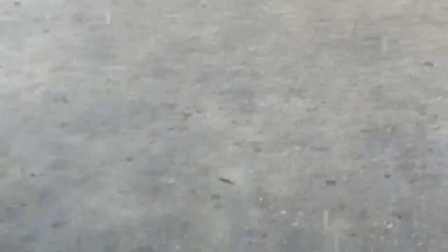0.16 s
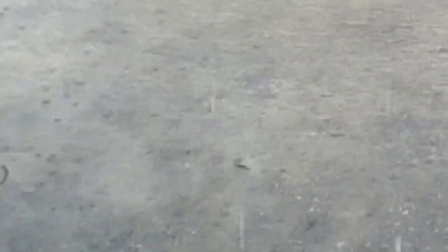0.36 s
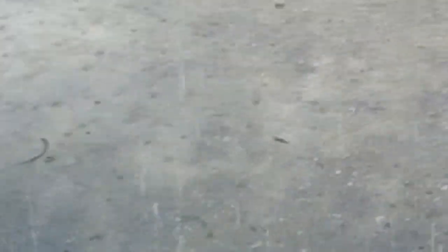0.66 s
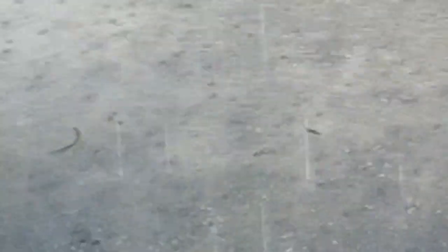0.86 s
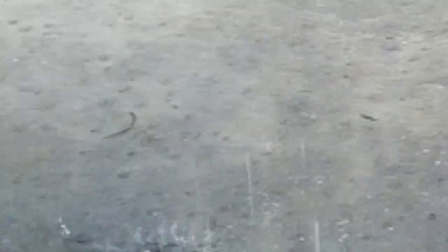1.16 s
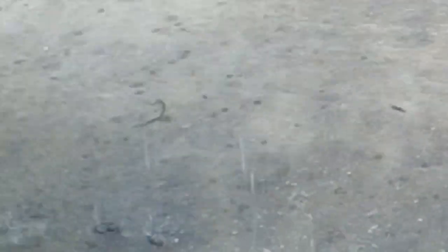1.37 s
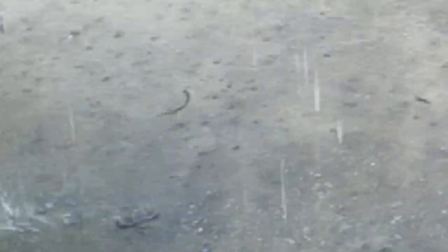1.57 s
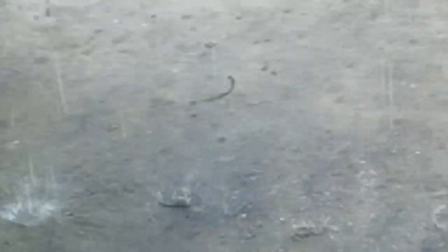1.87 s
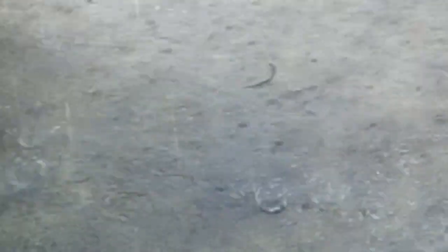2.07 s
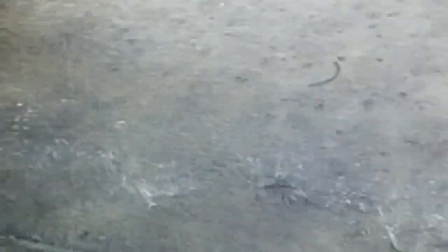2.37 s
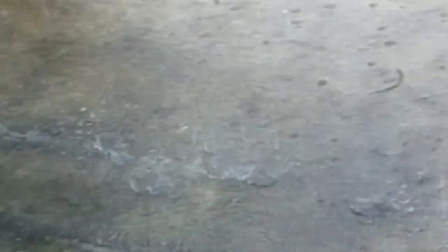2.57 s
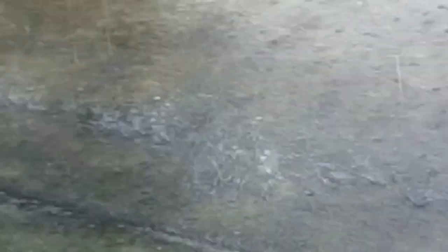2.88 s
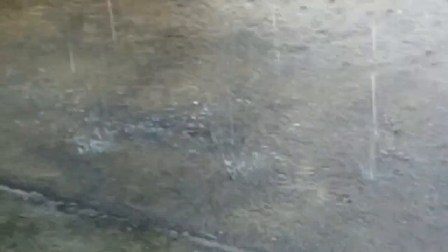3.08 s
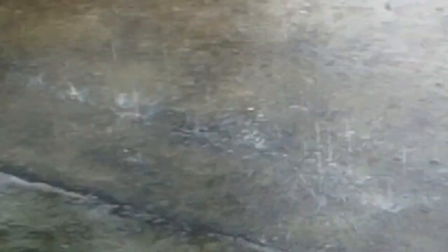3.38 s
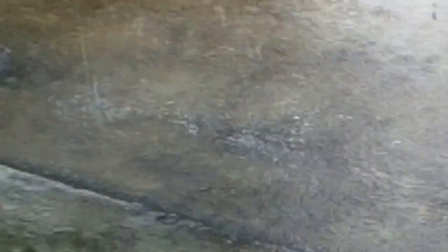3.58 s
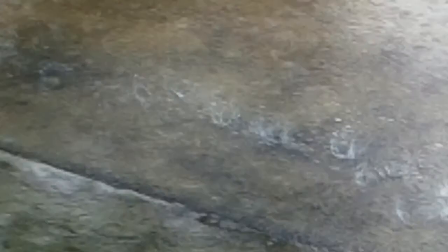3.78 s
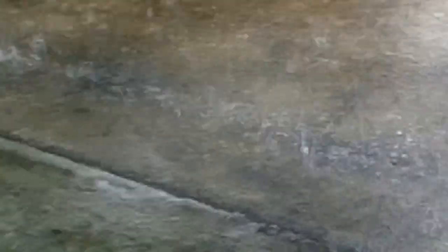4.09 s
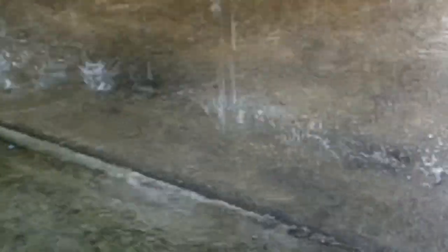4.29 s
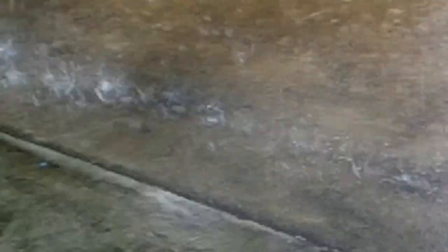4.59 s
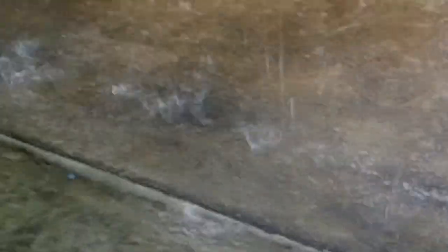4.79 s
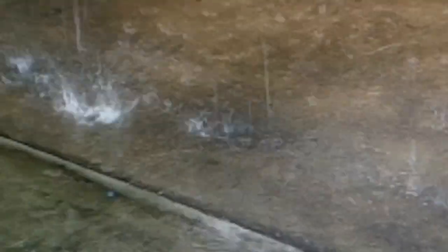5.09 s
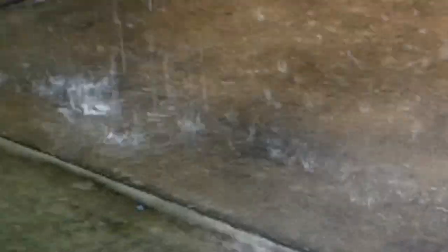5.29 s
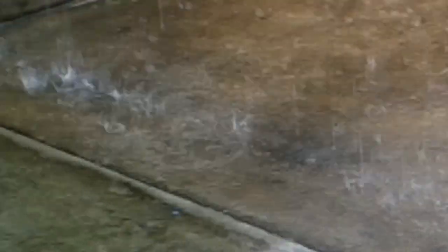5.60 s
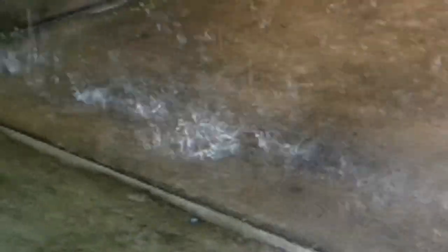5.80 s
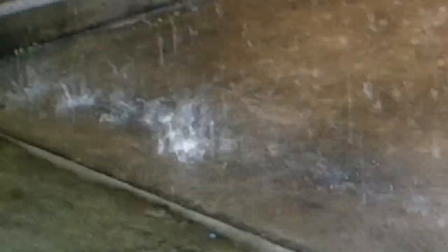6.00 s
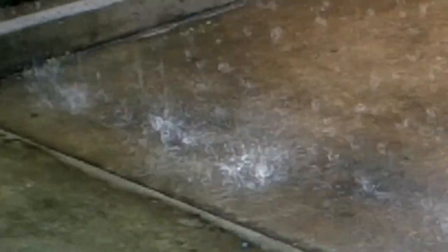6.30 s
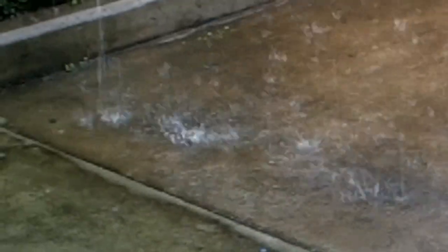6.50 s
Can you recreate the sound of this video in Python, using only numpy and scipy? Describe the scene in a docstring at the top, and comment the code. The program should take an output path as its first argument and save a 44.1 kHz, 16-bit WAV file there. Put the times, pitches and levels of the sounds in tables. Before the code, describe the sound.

Heavy rain on a paved yard, heard in mono from under the eaves, already running at the start and never pausing. Roof runoff forms a crisp, bright patter on stone, strongest in the upper range, with fine hissing spray and watery plinks. From 0 to 2.5 s the bed is thinner, and irregular gobs burst on the paving several times a second, clearer near 0.3, 0.6 and 0.8 s. Lower, wet slaps hit puddles around 2.2 and 2.7 s, followed by a sharp splatter near 2.85 s. From about 2.7 s the distant downpour, a soft low-to-mid wash with a faint wall echo, rises steadily until about 5.25 s, and the patter thickens with it. Heavy drops tick close by near 2.9, 3.3, 4.0, 4.8 and 5.8 s. Bursts become sparser after 4.5 s, with a sharp one at 5.9 s. The dense rain continues to the end at about 6.6 s.

```python
"""A paved yard in heavy rain, heard from under the eaves by a mono microphone that turns slowly to the open.
Roof runoff is filtered random impacts, clumped into patter on stone and puddles and a fine spray.
Larger gobs burst on the stone or slap into puddles as showers of short decaying sines, and a few heavy
drops tick close by. Behind them the distant downpour is a dense wash with one faint wall echo."""
import sys
import numpy as np
from scipy import signal
from scipy.fft import rfft, irfft, next_fast_len
from scipy.io import wavfile

SR = 44100
rng = np.random.default_rng(int(sys.argv[2]) if len(sys.argv) > 2 else 0)


def persist_wave(psi):
    """Save psi, clipped to +-1, as 16-bit WAV."""
    counts = np.round(np.clip(psi, -1, 1) * 32767).astype(np.int16)
    wavfile.write(sys.argv[1], SR, np.atleast_2d(counts).T)


N = 292817  # samples

# Gobs bursting on paving. Each row: start in seconds, relative level in dB, pour time in seconds,
# fine spray in dB relative to that level, central droplet pitch in Hz.
BURST_GOBS = [(0.02, -28.5, 0.069, -3, 5500), (0.167, -23.5, 0.075, -8, 5490),
              (0.317, -19, 0.035, -20, 6270), (0.393, -27, 0.08, -8, 5820), (0.486, -23.5, 0.096, -6, 6060),
              (0.613, -21, 0.024, -11, 5770), (0.757, -21, 0.048, -7, 5970), (0.842, -24.5, 0.08, -9, 5450),
              (1.032, -22.5, 0.059, -6, 5540), (1.128, -25, 0.07, -4, 5970), (1.353, -23, 0.072, -15, 5700),
              (1.441, -23, 0.077, -9, 5800), (1.533, -27, 0.096, -13, 5530),
              (1.613, -25.5, 0.057, -13, 5870), (1.774, -26, 0.087, -3, 6090),
              (1.983, -24, 0.057, -1.5, 6150), (2.129, -22, 0.045, -7.5, 6140),
              (2.217, -23, 0.082, -7, 5750), (2.43, -34, 0.062, -3, 5700), (2.643, -25.5, 0.093, -6, 5700),
              (2.741, -24.5, 0.084, -4.5, 5650), (2.848, -18.5, 0.012, -6, 6180),
              (2.929, -25.0, 0.022, -11, 5750), (3.04, -21.5, 0.018, -15, 5380),
              (3.174, -26, 0.13, -8, 5520), (3.318, -25.5, 0.04, -6, 5740), (3.41, -24.5, 0.055, -11, 5530),
              (3.47, -22.5, 0.051, -11, 5360), (3.7, -20.5, 0.022, -16, 5550),
              (3.825, -24, 0.053, -6, 5590), (3.935, -19.5, 0.02, -18, 5560),
              (4.012, -25, 0.035, -18, 5470), (4.171, -24.0, 0.031, -3, 5600), (4.282, -24, 0.13, -4, 5460),
              (4.492, -22.5, 0.033, -8.5, 5720), (4.778, -23, 0.018, -20, 5500),
              (5.056, -25.5, 0.1, -5, 5640), (5.246, -27, 0.018, -7, 5460), (5.49, -24, 0.015, -13, 5800),
              (5.717, -28, 0.14, -22, 5410), (5.8, -28, 0.032, -11, 5700), (5.893, -18, 0.013, -7, 6000),
              (6.299, -25, 0.085, -2, 5620), (6.433, -25, 0.058, -7, 5540)]
# Gobs slapping into puddles. Each row: start in seconds, relative level in dB, pour time in seconds,
# central bubble pitch in Hz.
SLAP_GOBS = [(.048, -24, 0.033, 2380), (.505, -32, 0.034, 2600), (0.851, -28.5, 0.067, 2900),
             (1.201, -29, 0.046, 2620), (1.447, -25, .035, 2760), (1.509, -25, 0.069, 2940),
             (2.124, -27, 0.044, 2840), (2.212, -22, 0.015, 1820), (2.225, -26.5, .022, 2370),
             (2.696, -19, 0.014, 1850), (2.712, -22.5, 0.019, 2380), (2.781, -29, .07, 2600),
             (3.175, -29, 0.094, 2600), (3.421, -35, 0.081, 2100), (3.647, -26.5, 0.038, 2500),
             (3.756, -30, 0.025, 2600), (3.824, -25.5, 0.025, 2800), (4.187, -25, 0.042, 1650),
             (4.38, -36, 0.12, 2480), (4.665, -28, 0.035, 2610), (5.142, -25, 0.048, 2590),
             (5.35, -31, 0.17, 2540), (5.665, -28.5, .02, 2600), (5.805, -28, .07, 2700)]

TOP_HZ = 15750  # highest droplet pitch, and the upper band edge of the microphone


def runoff(paving_db, puddle_db, spray_db):
    """Superposition: roof water is a continuous patter per surface plus distinct single drops."""
    # Spectra of patter on stone, patter in puddles and spray. Each row: frequency in Hz, relative gain in dB.
    paving_spectrum = [(30, -67), (100, -36), (300, -15), (750, -6.5), (1300, -8.5), (2200, -8),
                       (3700, -1.5), (5000, 0.5), (6300, -0.5), (8000, -7.5), (11000, -17.5), (16000, -27)]
    puddle_spectrum = [(30, -51), (100, -35), (700, -16), (1500, -2), (2400, 1), (3200, 2), (4500, -3),
                       (8000, -25), (16000, -56)]
    spray_spectrum = [(100, -39), (3000, -13.5), (7000, 4), (9000, -1.5), (11000, -5), (13500, -12),
                      (16000, -15)]
    paving = patter(paving_spectrum, per_s=15000, spread_db=1.5, clumping=0.18)
    puddle = patter(puddle_spectrum, per_s=7000, spread_db=1.5, clumping=0.53)
    spray = patter(spray_spectrum, per_s=9000, spread_db=3.5, clumping=0.5)
    ticks = drips(db=-2.5, hz=5730, pitch_spread=0.13, cycles=1.2, count=260)
    plinks = drips(db=1.0, hz=2600, pitch_spread=0.21, cycles=3.9, count=130)
    on_stone = undb(paving_db) * (undb(-2.5) * paving + ticks)
    in_puddles = undb(puddle_db) * (undb(-4.5) * puddle + plinks)
    return on_stone + in_puddles + undb(spray_db) * spray


def stone_bursts():
    """Impact break-up: a gob strikes stone and its droplets ring briefly after the harder first hit."""
    start, db, pour_s, _, hz = np.transpose(BURST_GOBS)
    gobs = zip(start, db, pour_s, hz)
    return undb(-5) * splashes(gobs, cycles=2.6, pitch_spread=0.13, spread_db=1.5, impact_db=3, count=60)


def puddle_slaps():
    """Damped oscillation: a gob slapping into water gives lower, quickly damped bubble tones."""
    return undb(-1.3) * splashes(SLAP_GOBS, cycles=1.14, pitch_spread=0.11, spread_db=0.5,
                                 impact_db=0, count=32)


def heavy_drops():
    """Single impacts: each heavy drop near the microphone is one short damped tick."""
    # Ticks close by. Each row: start in seconds, relative level in dB.
    heavy = [(2.8726, -23.5), (3.3455, -18), (3.9563, -18), (4.773, -17), (4.802, -16), (5.8048, -18.5)]
    scatter_s, hz = 0.0021, 5400  # delay scale of the tick, central pitch
    gobs = [(start, db, scatter_s, hz) for start, db in heavy]
    return splashes(gobs, cycles=1.6, pitch_spread=0.08, spread_db=0, impact_db=0, count=1)


def drips(db, hz, pitch_spread, cycles, count):
    """Random arrivals: near drops of varied pitch and level, each with two rebounding droplets."""
    when = rng.random(count) * N / SR
    pitch, size = np.clip(rng.standard_normal((2, count)), -2, 2)
    scatter_s = np.full(count, 0.001)
    gobs = zip(when, db + 1.4 * size, scatter_s, hz * np.exp(pitch_spread * pitch))
    return splashes(gobs, cycles, pitch_spread=0.21, spread_db=15, impact_db=9, count=3)


def splashes(gobs, cycles, pitch_spread, spread_db, impact_db, count):
    """Damped resonance: droplets land ever more thinly, each decaying over a set number of cycles."""
    out = np.zeros(N)
    age = np.arange(256) / SR
    for start, db, scatter_s, hz in gobs:
        landed = (np.arange(count) + rng.random(count)) / count
        delay = -scatter_s * np.log(1 - 0.97 * landed)  # exponential thinning, cut off at 97 %
        pitch, size = np.clip(rng.standard_normal((2, count, 1)), -2, 2)
        size_db = spread_db * size
        size_db[0] = impact_db  # the first hit
        turns = age * np.minimum(hz * np.exp(pitch_spread * pitch), TOP_HZ)
        envelope = np.exp(-turns / cycles) * (1 - np.exp(-2 * turns))
        flow = undb(size_db) * np.sin(2 * np.pi * turns) * envelope
        drops = np.gradient(flow, axis=1)  # pressure follows the change of flow, which weakens the bass
        # energy of the whole splash: its level held for the scatter time
        drops *= undb(db) * np.sqrt(scatter_s * SR / np.sum(drops ** 2))
        where = ((start + delay) * SR).astype(int)[:, None] + np.arange(len(age))
        out += np.bincount(where.ravel(), drops.ravel(), N)[:N]
    # water lands softly, so big droplets carry little above 7800 Hz
    return signal.sosfilt(signal.butter(4, 7800, fs=SR, output="sos"), out)


def pour(steady_db, starts, levels_db, lengths, release_s):
    """Power addition: level in dB of a trickle plus gobs that swell, hold and die away."""
    attack_s = 0.011
    power = undb(steady_db) ** 2
    for start, db, length in zip(starts, levels_db, lengths):
        age = np.arange(N) / SR - start
        swell = np.clip(age / attack_s, 0, 1)
        decay = np.exp(-np.maximum(age - length, 0) / release_s)
        power = power + (undb(db) * swell * decay) ** 2
    return 10 * np.log10(power)


def trickle(far_db, open_db, follows):
    """Directional gain: the trickle's level in dB follows the downpour's as the microphone turns."""
    return open_db + follows * (far_db + 25)  # open_db holds where the downpour is at -25 dB


def patter(spectrum, per_s, spread_db, clumping):
    """Filtered shot noise: clumped impacts take the spectrum of one surface, at unit rms."""
    ticks = impacts(per_s, spread_db) * clumps(per_s=57, fade_s=0.022, depth=clumping)
    return unit(colour(ticks, spectrum))


def impacts(per_s, spread_db):
    """Shot noise: impulses of random sign at random moments, their sizes spread in dB."""
    lands = rng.random(N) < per_s / SR
    size_db = spread_db * np.minimum(rng.standard_normal(N), 2.7)
    return unit(lands * rng.choice([-1, 1], N) * undb(size_db))


def clumps(per_s, fade_s, depth):
    """Exponential relaxation: large drops throw off smaller ones, so power jumps and then fades."""
    throws = (rng.random(N) < per_s / SR) * rng.exponential(1, N)
    thrown = signal.lfilter([1], [1, -np.exp(-1 / (fade_s * SR))], throws)
    return np.sqrt(1 + depth * thrown)


def downpour(gain):
    """Incoherent summation: countless distant drops merge into a wash, with one wall reflection."""
    # Spectrum of the wash. Each row: frequency in Hz, relative gain in dB.
    wash_spectrum = [(25, -46), (55, -31.5), (88, -20.5), (112, -19.5), (145, -7), (190, -5.5), (300, 0.5),
                     (420, -2.5), (730, -0.5), (1000, -3), (1700, -1.5), (3000, -15), (16000, -55)]
    echo_s, wall_share = 0.0126, 0.1  # echo delay, echo amplitude relative to the wash
    wash = patter(wash_spectrum, per_s=20000, spread_db=3.5, clumping=0.04)
    echo = np.roll(wash, int(echo_s * SR))
    return gain * (wash + wall_share * echo)


def far_level():
    """Directional gain: the downpour's level in dB changes as the microphone turns to the open."""
    # Distant downpour. Each row: time in seconds, level in dB before the microphone.
    far = [(0.0, -31.0), (0.9, -31.5), (1.7, -32.0), (2.15, -31.5), (2.58, -32.5), (2.72, -30.5),
           (3.3, -30.0), (3.55, -29), (4.3, -27.0), (4.95, -26.0), (5.25, -25.5), (6.64, -26)]
    return np.interp(np.arange(N) / SR, *np.transpose(far))


def undb(db):
    """Logarithmic level: decibels to amplitude gain."""
    return 10 ** (np.asarray(db) / 20)


def unit(x):
    """Power normalization: scale to an rms of one."""
    return x / np.sqrt(np.mean(x ** 2))


def colour(x, points):
    """Minimum phase: a causal filter through (Hz, dB) points, from the cepstrum of the log gain."""
    hz, db = np.transpose(points)
    size = next_fast_len(len(x) + 4096, True) // 2 * 2
    bins = np.maximum(np.arange(size // 2 + 1) * SR / size, 1)
    gain_db = np.interp(np.log(bins), np.log(hz), db)
    cepstrum = irfft(np.log(undb(gain_db)))
    # fold the cepstrum onto positive time
    cepstrum[1:size // 2] *= 2
    cepstrum[size // 2 + 1:] = 0
    return irfft(rfft(x, size) * np.exp(rfft(cepstrum)))[:len(x)]


def scene():
    """Superposition: all the water, alike in both channels; gobs drive both droplets and patter."""
    far_db = far_level()
    burst_s, burst_db, burst_length, fine_db, _ = np.transpose(BURST_GOBS)
    slap_s, slap_db, slap_length, _ = np.transpose(SLAP_GOBS)
    paving_trickle = trickle(far_db, open_db=-18.5, follows=0.84)
    puddle_trickle = trickle(far_db, open_db=-32.5, follows=0.4)
    spray_trickle = trickle(far_db, open_db=-31.5, follows=0.4)
    paving_db = pour(paving_trickle, burst_s, burst_db, burst_length, release_s=0.047)
    puddle_db = pour(puddle_trickle, slap_s, slap_db, slap_length, release_s=0.03)
    spray_db = pour(spray_trickle, burst_s, burst_db + fine_db, burst_length, release_s=0.047)
    near = runoff(paving_db, puddle_db, spray_db) + stone_bursts() + puddle_slaps() + heavy_drops()
    water = near + downpour(undb(far_db))
    return np.array([water, water])


def record(dry):
    """Linear filtering: the microphone's narrow port colours the sound and the top is cut."""
    # Response of the port. Each row: frequency in Hz, gain in dB.
    port = [(1250, 1.66), (1630, 3.5), (1760, -1), (1920, -6), (2150, -1), (2500, 2.5), (2800, 2.8),
            (3280, -3), (3850, 4), (4280, 1.5), (4720, 5), (6100, 5), (7300, -.3), (16000, -1)]
    heard = np.array([colour(channel, port) for channel in dry])
    return signal.sosfilt(signal.ellip(12, 0.1, 90, TOP_HZ, fs=SR, output="sos"), heard)


dry = scene()
out = record(dry)
persist_wave(out)
```